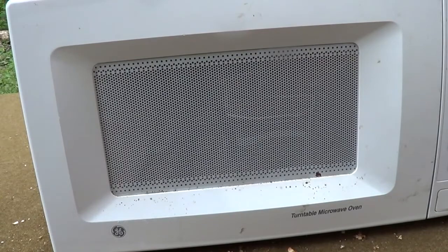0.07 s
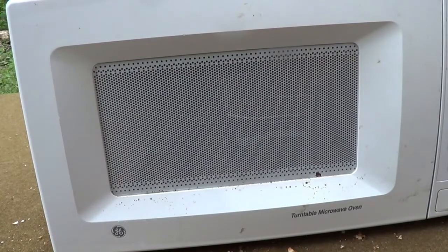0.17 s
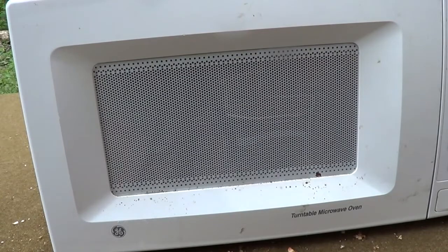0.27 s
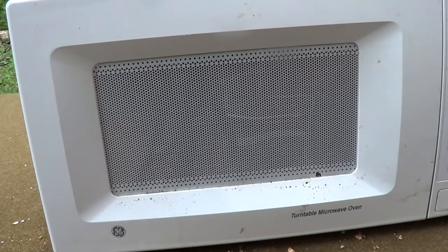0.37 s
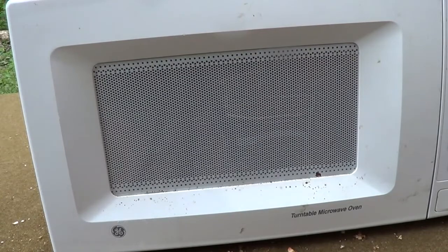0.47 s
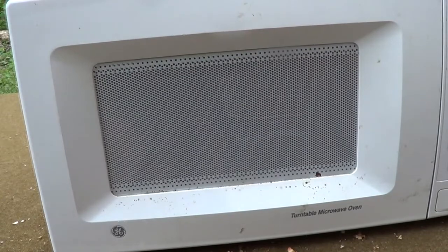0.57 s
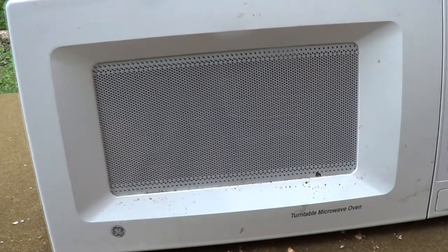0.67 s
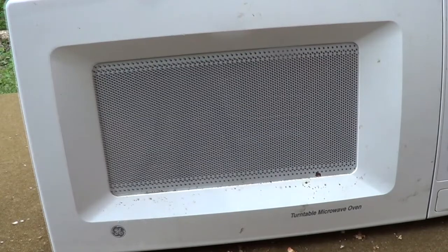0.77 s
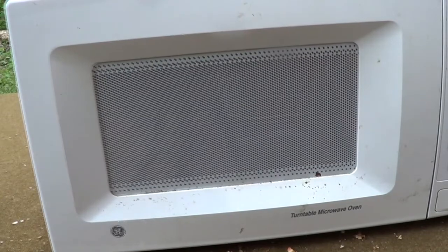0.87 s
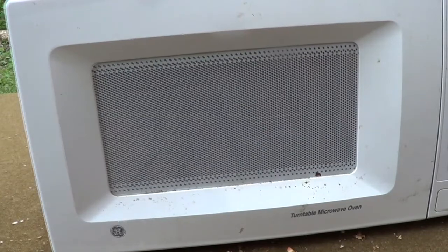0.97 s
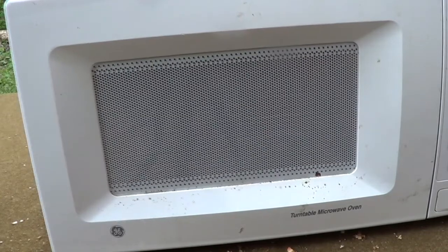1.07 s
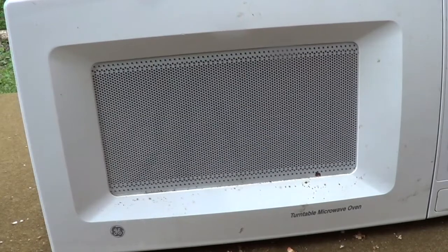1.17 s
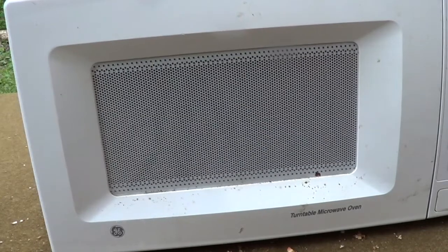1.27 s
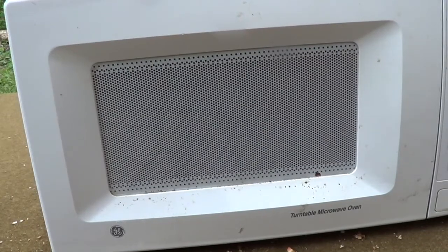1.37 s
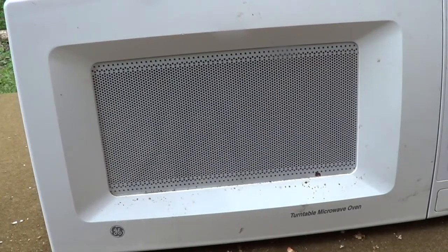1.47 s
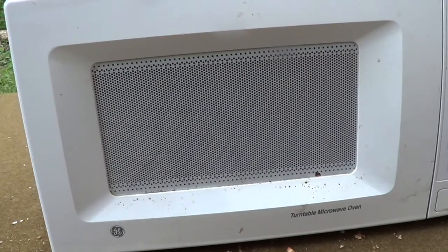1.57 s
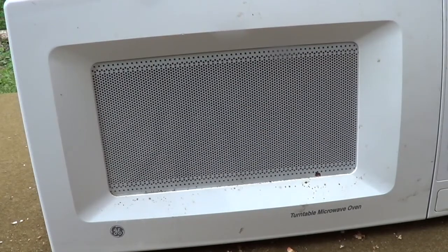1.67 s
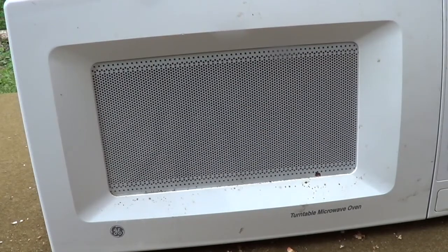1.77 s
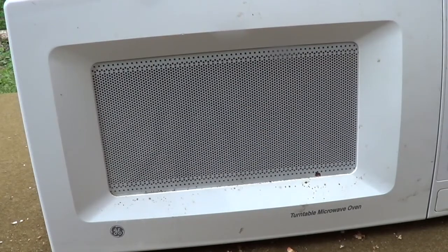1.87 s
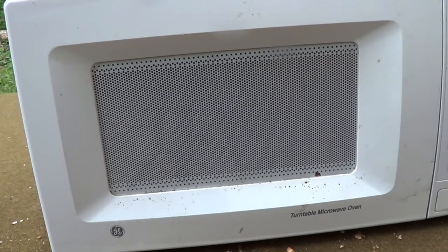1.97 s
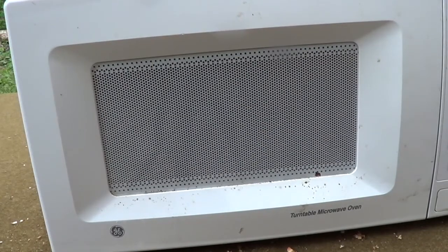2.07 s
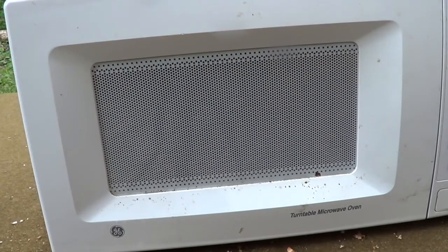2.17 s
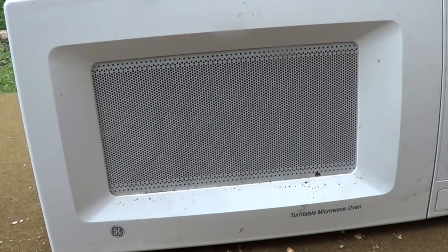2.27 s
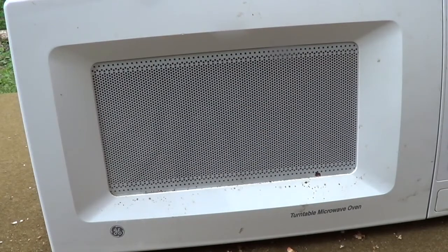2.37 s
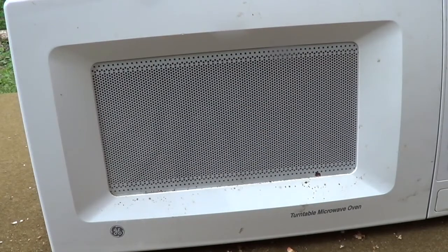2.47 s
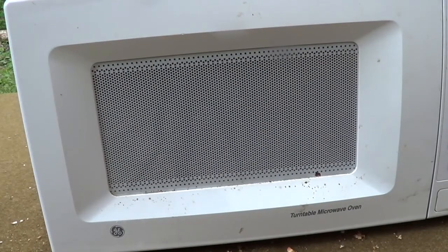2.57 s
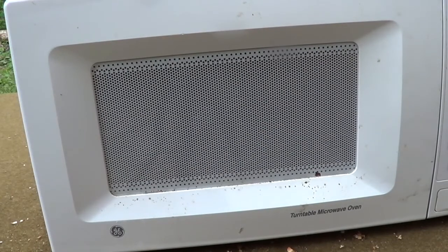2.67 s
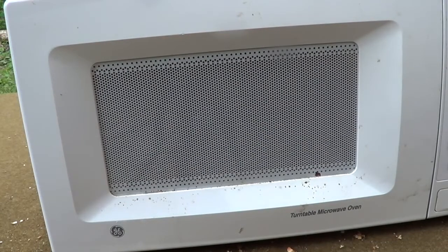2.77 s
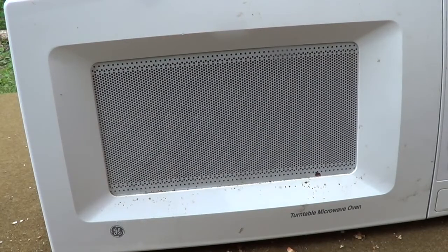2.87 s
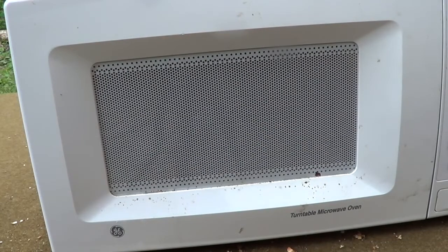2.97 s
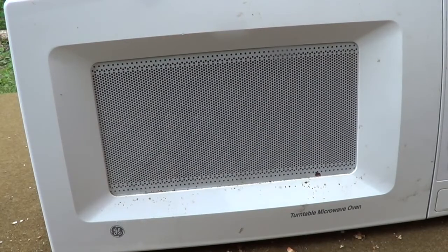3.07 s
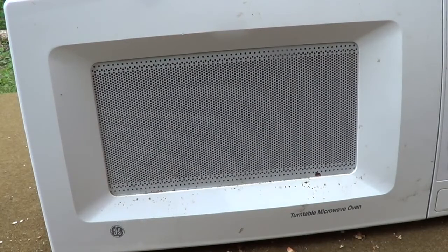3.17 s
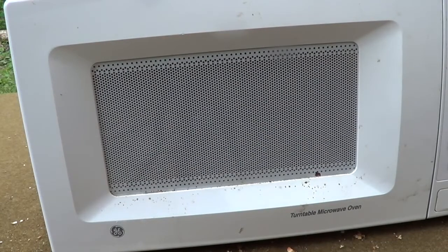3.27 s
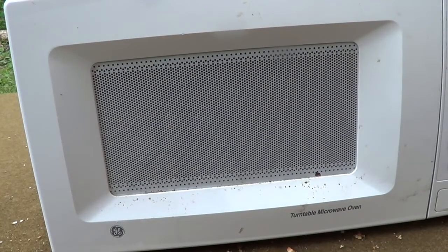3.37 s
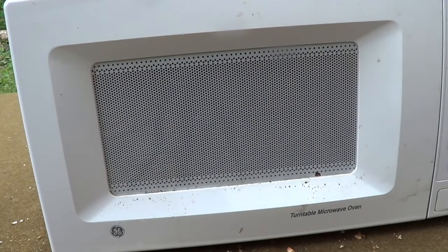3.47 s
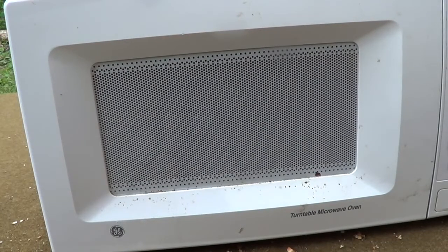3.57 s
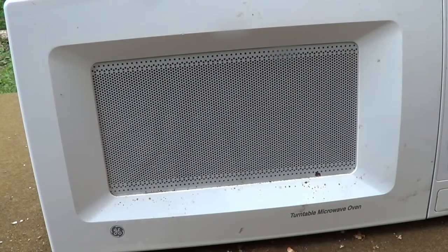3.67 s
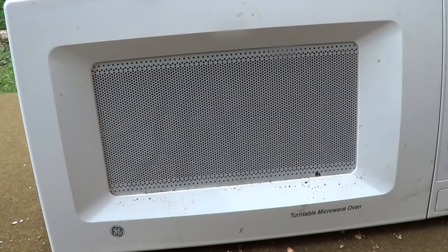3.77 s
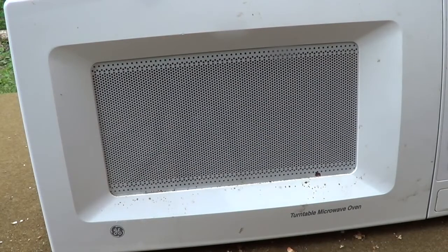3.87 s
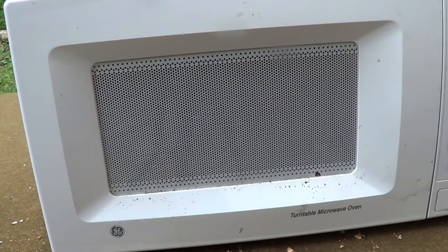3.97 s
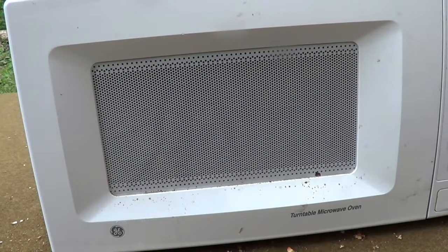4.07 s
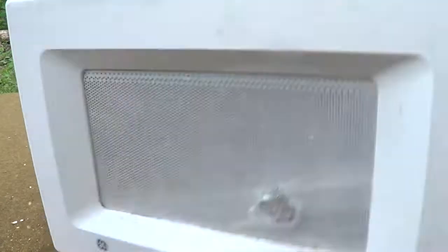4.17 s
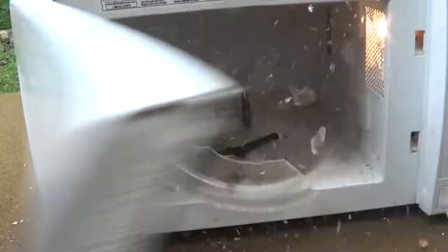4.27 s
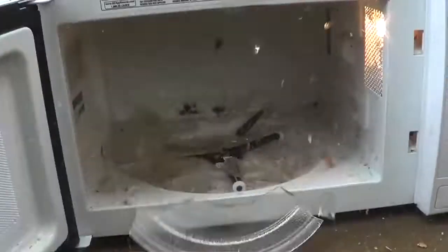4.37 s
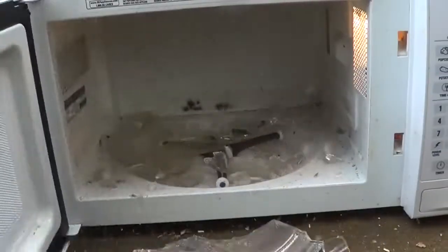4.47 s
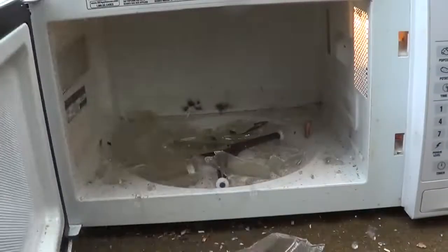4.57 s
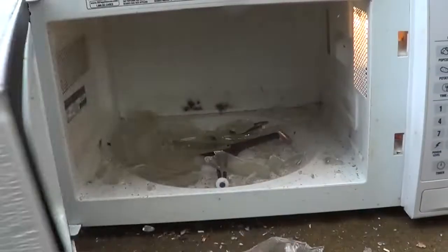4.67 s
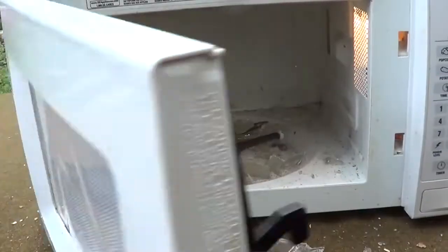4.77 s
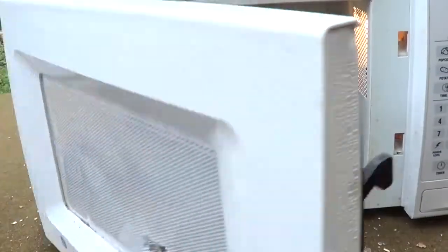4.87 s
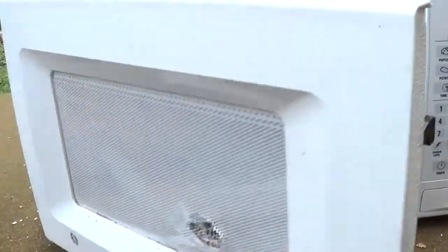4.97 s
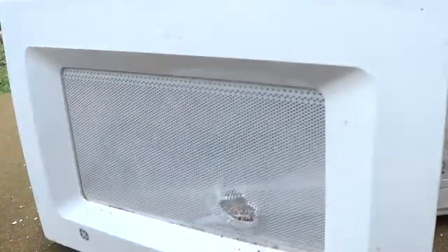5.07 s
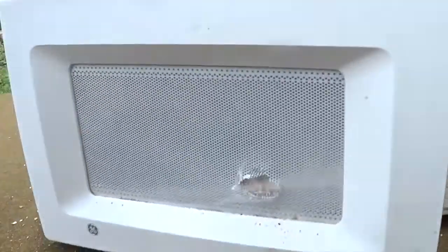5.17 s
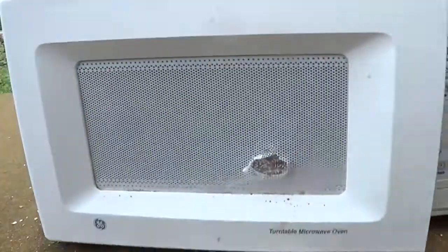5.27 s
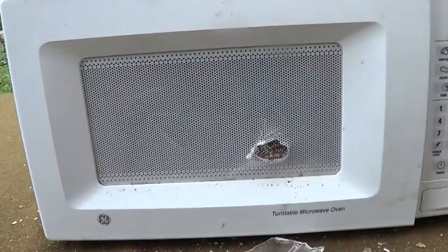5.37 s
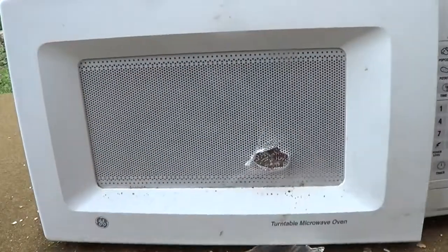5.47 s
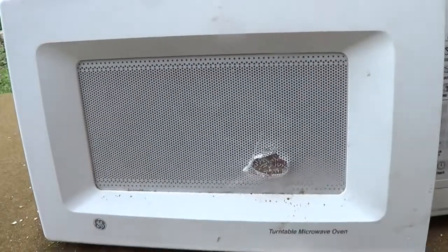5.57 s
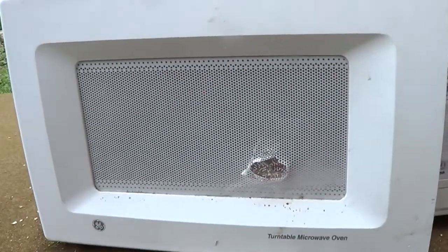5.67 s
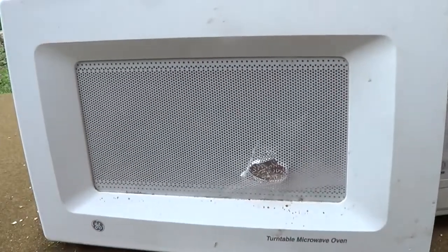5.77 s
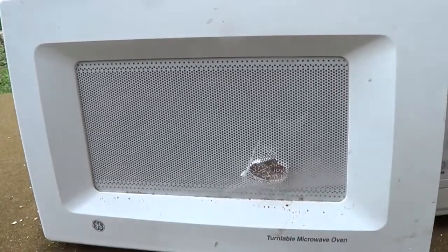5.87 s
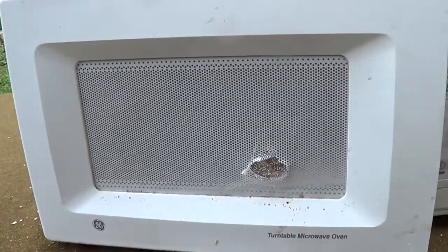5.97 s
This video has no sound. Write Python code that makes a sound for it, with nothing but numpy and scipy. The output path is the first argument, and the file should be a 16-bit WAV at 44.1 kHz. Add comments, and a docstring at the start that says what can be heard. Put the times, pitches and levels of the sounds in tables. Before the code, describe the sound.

Outdoors, a microwave oven hums close by, its fan whirring while cartridges inside sizzle, spit and tick. The hum strengthens and the frying grows. After about four seconds a loud bang throws the door open and cuts the hum. The glass turntable shatters, shards ringing on the steel floor as the fan runs down. The door swings back, slams, rattles and gives a last click.

```python
"""Outdoors, a microwave oven runs: its transformer hums, its fan turns, the cartridges inside sizzle
and spit amid dry ticks. The magnetron warms and the oven takes up its load. At 4.2 s a cartridge
goes off and blows the door open; the power cuts and the fan runs down. The glass turntable shatters,
and its shards ring on the steel floor and settle. At 5.4 s the door swings back, slams and rattles;
last, its latch clicks."""
import sys
import numpy as np
from scipy import signal
from scipy.fft import rfft, irfft, next_fast_len
from scipy.io import wavfile
from scipy.ndimage import map_coordinates

SR = 44100
rng = np.random.default_rng(int(sys.argv[2]) if len(sys.argv) > 2 else 0)


def store_wav(level_fs):
    """Save 16-bit WAV to argv[1]."""
    pcm = np.round(np.clip(np.atleast_2d(level_fs), -1, 1) * 32767)
    wavfile.write(sys.argv[1], SR, pcm.T.astype(np.int16))


N = 265702
MAINS_HZ, BANG_S = 59.98, 4.2355


def amp(db):
    """Decibels to gain."""
    return 10 ** (np.asarray(db) / 20)


def unit(x):
    """x at rms 1."""
    return x / np.sqrt(np.mean(x ** 2) + 1e-20)


def along(points, hz):
    """(f/Hz, value) points read on a log axis."""
    f, value = np.transpose(points)
    return np.interp(np.log(hz + 1), np.log(f + 1), value)


def clock(size=N):
    """Seconds at each sample."""
    return np.arange(size) / SR


def wobble(rate_hz):
    """Smooth random curve, rate_hz knots a second."""
    return map_coordinates(rng.standard_normal(int(N * rate_hz / SR) + 4), [clock() * rate_hz])


def fade(t, t60_s):
    """Full until t = 0, then 60 dB down every t60_s."""
    return np.exp(-np.log(1000) * np.maximum(t, 0) / t60_s)


def filtered(x, response):
    """x through a gain given as a function of Hz."""
    size = x.shape[-1]
    padded = next_fast_len(size + 8192)
    return irfft(rfft(x, padded) * response(np.fft.rfftfreq(padded, 1 / SR)), padded)[..., :size]


def add(track, start_s, sound):
    """Mix a sound into the track."""
    part = track[:, round(start_s * SR):][:, :sound.shape[1]]
    part += sound[:, :part.shape[1]]


# stereo width, side against mid: [f/Hz, level/dB]
WIDTH = [(30, -5.5), (100, -22), (300, -6), (700, -6), (2000, -8), (4000, -11.5), (12000, -39)]
def noise(spectrum, size=N):
    """Coloured stereo noise at rms 1, wide in the mids, centred in the treble."""
    def response(hz):
        mid_db = along(spectrum, hz)
        return amp([mid_db, mid_db + along(WIDTH, hz)])
    mid, side = filtered(rng.standard_normal((2, size)), response)
    return unit(np.array([mid + side, mid - side]))


def burst(spectrum, t60_s):
    """A sudden dying puff of dense vibration."""
    return noise(spectrum, size=SR // 2) * fade(clock(SR // 2), t60_s)


def ring(modes, centre_hz, scatter_db, detune=0):
    """One blow on a set of modes, favouring those near centre_hz."""
    hz, db, t60_s = np.transpose(modes)[:, :, None]
    t = clock(SR // 2)
    strength, spread, offset, tuning = rng.standard_normal((4, len(hz), 1))
    gain = amp(db + scatter_db * strength - 39 * np.log2(hz / centre_hz) ** 2)
    envelope = gain / np.sqrt(np.sum(gain ** 2) / 2) * fade(t, t60_s) * (1 - fade(t, 0.0024))
    phase = 2 * np.pi * hz * (1 + detune * tuning) * t + np.pi * offset
    skew = amp(along(WIDTH, hz)) * spread
    return np.array([np.sum(envelope * np.sin(phase + side * skew), axis=0) for side in (1, -1)])


def tones(base_hz, harmonics, waver_db):
    """Harmonics of base_hz, slightly out of step between the ears."""
    phase = 2 * np.pi * np.cumsum(np.broadcast_to(base_hz, N)) / SR
    skew = np.array([[.3], [-.3]])
    out = np.zeros((2, N))
    for order, db in harmonics:
        gain = np.sqrt(2) * amp(db + waver_db * wobble(7))
        out += gain * np.sin(order * phase + skew + rng.uniform(0, 2 * np.pi))
    return out


# open-air spectrum: [f/Hz, level/dB]
OUTDOORS = [(15, -31), (25, -9.5), (81, -19.5), (142, 2.5), (264, -7), (475, -10.5), (749, -1.5),
            (927, -23), (1310, -15), (1500, -45), (3010, -21), (15000, -37)]
def outdoors():
    """A quiet outdoor rush and rumble."""
    rush = amp(-62.5) * noise(OUTDOORS)
    rumble = amp(-72.5) * noise([(20, 3), (70, -4), (250, -28.5), (1500, -67)])
    return rush + rumble


# transformer lines: [mains multiple, level/dB]
HUM_LINES = [(2, -5.5), (3, -10.5), (4, -9.5), (5, -28), (6, 1), (7, -62), (8, -17.5), (12, -19.5),
             (13, -41), (14, -29.5), (16, -39), (21, -29.5), (25, -45)]
def transformer(load):
    """The transformer hums at mains harmonics, louder under load."""
    return amp(-39 + 6.5 * load) * tones(MAINS_HZ, HUM_LINES, waver_db=0)


FAN_HZ = 41.8
# blade lines: [shaft multiple, level/dB]
BLADE_LINES = [(4, 0.5), (5, -17), (6, -23.5), (8, -13.5), (10, -23.5), (11, -45.5), (12, -12.5), (13, -33),
               (16, -22.5), (17, -26), (19, -22), (24, -35), (27, -22.5)]
def fan_blades(load, idle_share=0.04):
    """The blade tone follows a slightly unsteady shaft and comes in with the load."""
    shaft_hz = FAN_HZ * (1 + 0.0011 * wobble(5.14))
    return amp(-35) * np.maximum(load, idle_share) * tones(shaft_hz, BLADE_LINES, waver_db=0.44)


# draught and vent spectra: [f/Hz, level/dB]
DRAUGHT = [(25, -9.5), (90, -3.5), (150, 11), (270, 3.5), (450, 4), (600, 2), (760, 3.5), (950, -1),
           (1650, -1.5), (2600, -11.5), (3150, -12.5), (4000, -18), (8000, -22), (15000, -36)]
VENT_HISS = [(1500, -19.5), (4500, 1), (12000, -2.5), (16000, -9.5)]
def airflow(t, load):
    """The draught swells once per shaft turn and grows with load; the vents hiss evenly."""
    swell = 1 + 0.13 * np.sin(2 * np.pi * FAN_HZ * t)
    draught = amp(-42.5 + 2.5 * load + 0.65 * wobble(25.18)) * swell * noise(DRAUGHT)
    return draught + amp(-57.5) * noise(VENT_HISS)


# sizzle spectrum: [f/Hz, level/dB]
SIZZLE = [(2000, -20), (3100, 2), (5200, -6.5), (7400, -4.5), (9700, 0), (11000, -14), (15000, -9.5)]
# cavity peaks and dips: [f/Hz, width/Hz, level/dB]
CAVITY_COLOUR = [(3040, 170, 9), (3880, 57, 9), (4800, 65, -4), (6600, 410, 8), (8170, 330, 11),
                 (9300, 200, 9.5), (10200, 200, 4)]
def sizzle(heat_db):
    """The cartridges fry; the magnetron heats in pulses, so they flutter with the mains."""
    def cavity(hz):
        return amp(sum(db / (1 + (2 * (hz - f) / width) ** 2) for f, width, db in CAVITY_COLOUR))
    flutter = 1 + .3 * np.sin(2 * np.pi * 3 * MAINS_HZ * clock()) + .13 * wobble(90)
    frying = filtered(noise(SIZZLE), cavity)
    return amp(heat_db + 1.5 + 2.8 * wobble(30) + 0.63 * wobble(7.1)) * unit(flutter * frying)


def whine(t, centre_hz=15740, width_hz=110, throb_hz=13):
    """A faint throbbing whine near the top of hearing."""
    band = filtered(rng.standard_normal(N), lambda hz: np.exp(-((hz - centre_hz) / width_hz) ** 2))
    return amp(-63.5 + 4 * np.sin(2 * np.pi * throb_hz * t)) * unit(band)


# bright snap spectrum: [f/Hz, level/dB]
SNAP = [(1470, -36), (2500, -2), (3490, -9.5), (5560, -5), (9150, 7), (11500, -2), (13800, -3),
        (16000, -3.5)]
# cartridge flares: [t/s, level/dB, t60/s]
SPITS = [(0.10, -45, 0.41), (0.575, -43, 0.038), (0.79, -47, 0.3), (4.127, -28.5, 0.11),
         (4.1953, -26.5, 0.09)]
def spits():
    """The cartridges flare in short snaps and hisses."""
    out = np.zeros((2, N))
    for start_s, db, t60_s in SPITS:
        add(out, start_s, amp(db) * burst(SNAP, t60_s))
    return out


# tick spectrum: [f/Hz, level/dB]
DRY_TICK = [(400, -9), (1100, -2.5), (2000, 2.5), (4000, -9), (12000, -21)]
# dry ticks, last row the door latch: [t/s, level/dB]
TICKS = [(0.322, -39), (0.395, -40.5), (0.77, -41), (1.665, -40), (3.13, -39), (3.535, -37.5),
         (5.9574, -37.5)]
def ticks():
    """Dry ticks while the oven runs, and a last click of the door latch."""
    out = np.zeros((2, N))
    for start_s, db in TICKS:
        add(out, start_s, amp(db) * burst(DRY_TICK, t60_s=0.042))
    return out


# magnetron lines: [mains multiple, level/dB]
BUZZ_LINES = [(37, -20), (51, -14), (52, -19), (53, -20), (55, -13.5), (66, -15.5), (80, -17.5)]
def magnetron(load, heat_db):
    """Under load the magnetron buzzes at high mains harmonics."""
    return amp(heat_db) * load * tones(MAINS_HZ, BUZZ_LINES, waver_db=4)


# blast and plastic door spectra: [f/Hz, level/dB]
BLAST = [(59, -44.5), (100, -19.5), (389, -7), (547, -5.5), (1030, -26), (1310, -0.5), (1520, -5),
         (1680, 7.5), (2520, -7), (3120, 0), (3940, -2.5), (9410, 2), (16000, -19)]
DOOR_CLACK = [(70, -35), (130, -25), (220, -25), (330, -1.5), (500, -4.5), (615, -4.5), (740, 0),
              (1050, -14), (1330, 1.5), (1700, -10), (2500, -11.5), (3600, -13.5), (9200, -13),
              (15500, -28)]
def bang(level_db=-10.5):
    """A cartridge bursts; its crack rattles round the steel box and jolts the door."""
    out = np.zeros((2, N))
    add(out, BANG_S, amp(level_db) * burst(BLAST, t60_s=0.57))
    add(out, BANG_S, amp(level_db - 8.5) * burst(DOOR_CLACK, t60_s=0.27))
    return out


# coasting fan spectrum: [f/Hz, level/dB]
COAST = [(60, -29.5), (110, -14), (160, -10.5), (300, -9), (520, -3), (720, 12.5), (950, -1.5), (1350, 2),
         (1700, 1), (2500, -11.5), (4500, -18), (8000, -12), (15000, -15.5)]
def coasting_fan(t):
    """Heard through the open door, the fan's rush dies away."""
    return amp(-35) * (t > BANG_S) * fade(t - BANG_S, t60_s=3.62) * noise(COAST)


# casing panel modes: [f/Hz, level/dB, t60/s]
PANEL_MODES = [(124.5, -7.5, 0.14), (154, -13, 0.44), (178.2, -7.5, 0.23), (220, -1.5, 0.15),
               (246.8, -2.5, 0.32), (294, -6, .15), (330, -2, 0.22), (417.7, 34.5, 0.16), (503, 18.5, 0.12)]
# casing boom spectrum: [f/Hz, level/dB]
BOOM = [(60, -30), (115, -7.5), (150, -2.5), (235, -5.5), (310, -11), (700, -9), (1600, -20), (5000, -48)]
def thud(centre_hz, cutoff_hz=95):
    """The panels shake and leave a dull boom, with no deep bass below cutoff_hz."""
    panels = ring(PANEL_MODES, centre_hz, scatter_db=0.5, detune=0.02)
    boom = amp(-17) * burst(BOOM, t60_s=0.89)
    return signal.sosfilt(signal.butter(3, cutoff_hz, "highpass", fs=SR, output="sos"), panels + boom)


# steel cavity modes: [f/Hz, level/dB, t60/s]
CAVITY_MODES = [(610, 0.5, 0.13), (723, -3, 0.069), (784.5, -3, 0.25), (830, -0.5, 0.12), (943, -1, 0.051),
                (1023, -0.5, 0.11), (1100, -11.5, 0.048), (1225, 1, 0.055), (1580, -13.5, 0.13),
                (1640, -9, 0.31), (1680, -2.5, 0.11), (2020, 1, 0.07), (2530, 6, 0.069)]
# door blows: [t/s, clack level/dB, ring f/Hz, thud level/dB, thud f/Hz]
DOOR_BLOWS = [(4.259, -12, 1550, -25, 204.5), (4.291, -12, 860, -21, 194), (4.311, -12.5, 1180, -20, 207),
              (4.343, -22.5, 880, -24, 217), (4.455, -23, 1330, -32, 248), (5.128, -37, 1570, -56, 160),
              (5.4378, -22.5, 482, -38.5, 350), (5.443, -15.5, 1290, -47, 150),
              (5.461, -20, 516, -31.5, 156), (5.52, -36.5, 473, -47.5, 350), (5.534, -35.5, 520, -35, 140),
              (5.549, -37, 1300, -39.5, 160)]
def door():
    """The door hits its stop, later slams and rattles; each blow clacks, rings and shakes the box."""
    out = np.zeros((2, N))
    for start_s, clack_db, ring_hz, thud_db, thud_hz in DOOR_BLOWS:
        clack = amp(clack_db) * burst(DOOR_CLACK, t60_s=0.11)
        cavity = amp(clack_db - 2.5) * ring(CAVITY_MODES, ring_hz, scatter_db=-3, detune=0.013)
        add(out, start_s, clack + cavity + amp(thud_db) * thud(thud_hz))
    return out


# shard pitches: [f/Hz, level/dB]
SHARD_TONES = [(3057, -11), (3552, -11), (3983, -6), (4220, -6), (4543, -14), (4909, -14), (5380, -12),
               (5447, -10), (5813, -10), (6524, -5), (6804, -12), (7321, -9), (8268, -3), (8764, -3),
               (8900, -9), (9410, -4), (9754, -9), (10228, -11), (11391, -5), (11606, -8), (11886, -8),
               (12338, -9), (12467, -11), (13199, -13), (13479, -13), (14039, -8), (14707, -14)]
# glass-on-steel spectrum: [f/Hz, level/dB]
SHATTER = [(1200, -23), (3000, -11), (5500, 1), (9000, 5.5), (12000, 0), (15800, -5.5)]
def shards(from_s, to_s, count=150, splinter_db=-3, click_db=-2.5):
    """Uneven contacts at rms 1: each clicks, rings two big shards and tinkles three splinters."""
    out, t = np.zeros((2, N)), clock(SR // 5)
    shard_hz, shard_db = np.transpose(SHARD_TONES)
    odds = amp(shard_db) / np.sum(amp(shard_db))  # the loudest are struck most often
    t60_s = np.array([[.16], [.11], [.09], [.06], [.04]])
    for start_s in np.linspace(from_s, to_s, count) + rng.uniform(-.004, .004, count):
        pick = rng.choice(len(shard_hz), size=2, p=odds)
        big_hz = shard_hz[pick] * rng.normal(1, .002, 2)
        splinter_hz = rng.uniform(2300, 15000, 3)
        hz = np.append(big_hz, splinter_hz)[:, None]
        db = np.append(shard_db[pick] / 2, splinter_db + along(SHATTER, splinter_hz))
        gain = amp(db + rng.uniform(-3, 3, len(hz)))[:, None]
        clink = np.sum(gain * np.sin(2 * np.pi * hz * t) * fade(t, t60_s), axis=0)
        click = amp(click_db) * noise(SHATTER, size=len(t)) * fade(t, t60_s=.018)
        add(out, start_s, amp(rng.uniform(-7, 0)) * (clink + click))
    return out / np.std(out[out != 0])


# crunching glass spectrum: [f/Hz, level/dB]
CRUNCH = [(88, -50.5), (150, -17.5), (555, -17), (821, -1), (1120, -5.5), (2550, -3.5), (4000, -4.5),
          (4760, -6), (7770, -10.5), (8560, -1), (10800, -27.5), (14800, -30.5), (16000, -21.5)]
def glass_shower(t, start_s=4.3, attack_s=0.044, release_at_s=4.77):
    """The turntable falls to bits; the clinking and crunching swells, holds and dies away."""
    envelope = np.clip((t - start_s) / attack_s, 0, 1) * fade(t - release_at_s, t60_s=0.66)
    crunch = amp(-30.5 + 1.4 * wobble(110)) * noise(CRUNCH)
    return envelope * (amp(-20) * shards(start_s, to_s=4.96) + crunch)


# large shard bounces: [t/s, level/dB, f/Hz]
PINGS = [(4.333, -20, 4909), (4.342, -18, 5813), (4.366, -17, 8764), (4.378, -17, 8268),
         (4.381, -16, 11606), (4.42, -17, 6524), (4.476, -20, 5447), (4.505, -17, 8764), (4.567, -14, 9410),
         (4.694, -17, 8810), (4.737, -13, 8268), (4.917, -27, 8268)]
def pings():
    """Large shards bounce, each with a click and one ringing mode."""
    out = np.zeros((2, N))
    for start_s, db, hz in PINGS:
        add(out, start_s, amp(db) * ring([(hz, 0, 0.18)], hz, scatter_db=0))
        add(out, start_s, amp(db - 14.5) * burst(SHATTER, t60_s=0.088))
    return out


# chunk landings: [t/s, relative crash level/dB, relative floor level/dB]
CHUNKS = [(4.383, -29, -23.5), (4.458, -15.5, -31.5), (4.553, -17, -28.5), (4.63, -17, -32),
          (4.674, -23.5, -37), (4.76, -29, -40), (4.796, -19, -29), (4.842, -16, -20), (4.889, -17, -25),
          (4.919, -38, -28.5), (4.934, -25.5, -38.5), (4.967, -41, -32.5)]
def chunks(floor_hz=1010):
    """Heavy glass chunks crash and crunch on the steel floor, which rings and thuds."""
    out = np.zeros((2, N))
    for start_s, crash_db, floor_db in CHUNKS:
        crash = amp(crash_db + 2) * burst(SHATTER, t60_s=0.054)
        crunch = amp(crash_db - 5) * burst(CRUNCH, t60_s=0.13)
        floor = amp(floor_db + 0.5) * ring(CAVITY_MODES, floor_hz, scatter_db=1, detune=0.014)
        add(out, start_s, crash + crunch + floor + amp(crash_db - 21.5) * thud(centre_hz=225))
    return out


# crumb landings: [t/s]
CRUMBS_S = [4.967, 5.026, 5.207, 5.274, 5.637, 5.785, 5.896]
def crumbs(first_db=-37.5, fall_db_per_s=21):
    """The last crumbs of glass settle, ever more faintly."""
    out = np.zeros((2, N))
    for start_s in CRUMBS_S:
        db = first_db - fall_db_per_s * (start_s - CRUMBS_S[0])
        add(out, start_s, amp(db) * burst(SNAP, t60_s=0.057))
    return out


def scene(load_from_s=0.54, load_full_s=1.29):
    """The oven takes up its load and heats until the opening door cuts the power; the wreck follows."""
    t = clock()
    load = np.clip((t - load_from_s) / (load_full_s - load_from_s), 0, 1)
    heat_db = -70 + 9.5 * load + 2.5 * t
    power = fade(t - BANG_S, t60_s=0.099)
    lean_left = amp([[.9], [-.9]])
    drone = lean_left * (transformer(load) + fan_blades(load) + magnetron(load, heat_db))
    oven = power * (drone + airflow(t, load) + sizzle(heat_db) + whine(t))
    wreck = bang() + coasting_fan(t) + door() + glass_shower(t) + pings() + chunks() + crumbs()
    return outdoors() + oven + spits() + ticks() + wreck


def record(dry, ceiling_db=-14.7, lag_s=.008, peak_limit=.85, top_hz=15950):
    """Gain control holds the crash at one level; peaks are rounded and all above top_hz is cut."""
    def follow(x):
        step = 1 / (lag_s * SR)
        return signal.lfilter([step], [1, step - 1], x)
    excess = follow(np.mean(dry ** 2, axis=0)) / amp(ceiling_db) ** 2
    reduction = follow(1 - np.maximum(excess, 1) ** -.5)
    held = dry * (1 - reduction)
    rounded = held / (1 + np.abs(held / peak_limit) ** 4) ** (1 / 4)
    return filtered(rounded, lambda hz: hz < top_hz)


dry = scene()
out = record(dry)
store_wav(out)
```